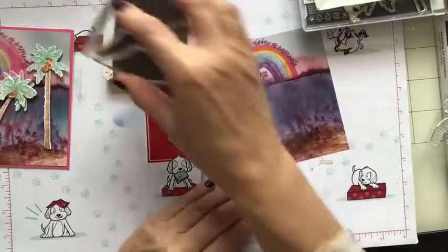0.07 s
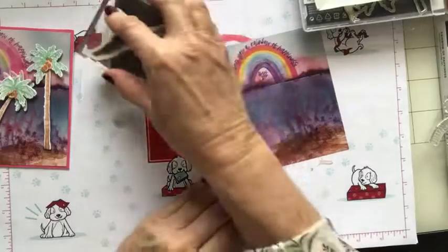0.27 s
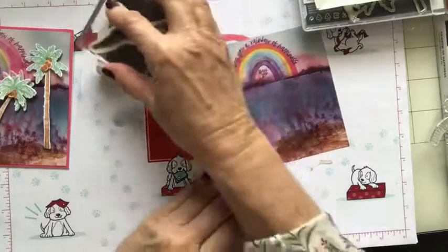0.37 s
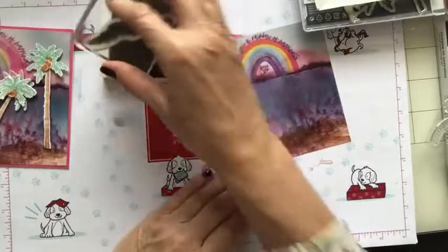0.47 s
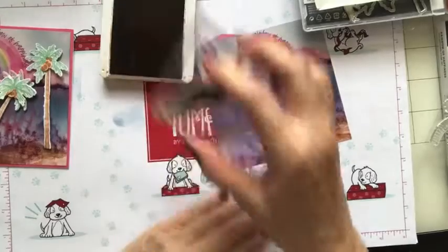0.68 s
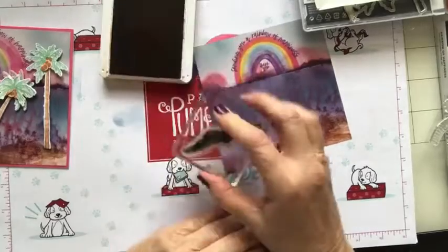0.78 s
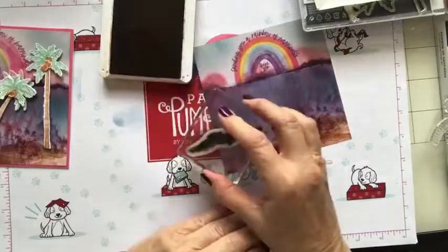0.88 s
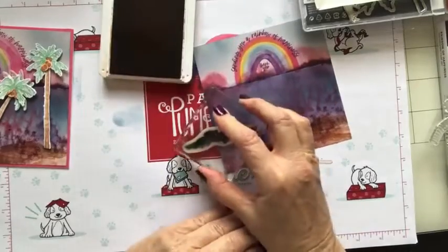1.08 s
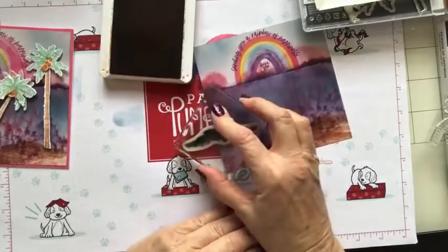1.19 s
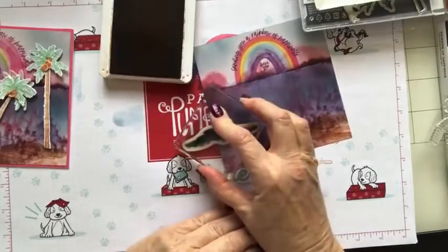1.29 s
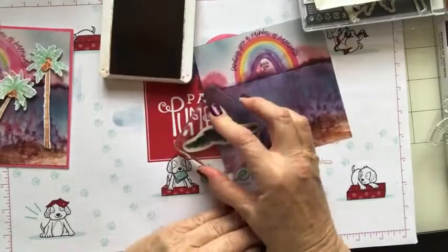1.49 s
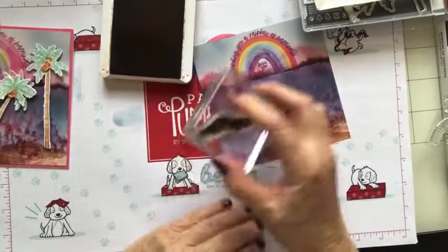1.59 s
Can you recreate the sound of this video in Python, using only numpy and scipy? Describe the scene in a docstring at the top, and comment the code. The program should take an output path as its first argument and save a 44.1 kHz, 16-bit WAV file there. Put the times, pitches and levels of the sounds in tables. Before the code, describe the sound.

Stamp block clacking on a plastic ink pad case atop a wooden desk. Soft hand rustle and a barely audible thin squeak open it; a duller, rattly clack comes at 0.22 s, then sharper, louder ones at 0.37 and 0.49 s, with short room reflections. Rustling fades from 0.6 to 1 s, a faint touch at 1.13, then paper swishes and a light tick at 1.56 over faint room hush.

```python
"""Throughout, a small furnished room hums faintly with filtered noise; at the start a hand rustles, with a thin squeak.
Then an acrylic stamp block is tapped three times on an ink pad in its plastic case, which clacks on a wooden desk:
short rough bursts ring the modes (natural tones) of case and desk, and the room answers with fading noise.
The hand rustles again; the block is set on paper, pressed, and ticks as it shifts, amid swishes of paper noise."""
import sys
import numpy as np
from scipy import signal
from scipy.io import wavfile
from scipy.ndimage import uniform_filter1d

SR = 44100
rng = np.random.default_rng(int(sys.argv[2]) if len(sys.argv) > 2 else 0)


def to_wav(sig):
    """Store sig (one row per channel, or 1-D mono) as 16-bit WAV at the path in sys.argv[1].

    Samples outside -1..1 are clipped; the rate is SR.
    """
    pcm = np.clip(np.atleast_2d(sig), -1, 1) * 32767
    pcm = np.round(pcm).astype(np.int16)
    wavfile.write(sys.argv[1], SR, pcm.T)  # frames by channels


N = 72765   # length of the scene in samples


def amp(db):
    """Turn decibels into a plain factor."""
    return 10 ** (np.asarray(db) / 20)


def rms_one(x):
    """Scale a sound to an rms (average strength) of 1."""
    return x / np.sqrt(np.mean(x ** 2) + 1e-20)


def at_hz(points, hz):
    """Read a curve at a frequency, along a logarithmic frequency axis."""
    curve_hz, values = np.transpose(points)
    return np.interp(np.log(hz), np.log(curve_hz), values)


def drift(rate_hz):
    """Smoothed random wander of rms 1; a higher rate wanders faster."""
    r = np.exp(-2 * np.pi * rate_hz / SR)
    wander = signal.lfilter([1], [1, -2 * r, r * r], rng.standard_normal(N + SR))
    return rms_one(wander[SR:])   # skip the filter's start


def bands(size):
    """Half-octave bands of noise, each with its centre frequency."""
    edges_hz = 25 * 2 ** np.arange(0, 9.7, .5)
    white = rng.standard_normal((2, size + SR // 2))
    for k, (low, high) in enumerate(zip(edges_hz, edges_hz[1:])):
        sos = signal.butter(2, [low, high], "band", fs=SR, output="sos")
        # neighbouring bands take turns between two noises
        yield np.sqrt(low * high), signal.sosfilt(sos, white[k % 2])[SR // 2:]


def coloured(spectrum, patchy_db, rate_hz):
    """Noise of a given spectrum whose bands flicker, partly together and partly alone; rms 1."""
    together = drift(rate_hz)
    total = 0
    for hz, band in bands(N):
        flicker_db = patchy_db * (.6 * together + drift(rate_hz))
        total = total + band * amp(at_hz(spectrum, hz) + flicker_db)
    return rms_one(total)


def room_tone():
    """Steady hush of softly flickering noise, with a low lumpy rumble that swells and fades."""
    # colour of the hush: (frequency [Hz], relative level per Hz [dB])
    hush_colour = [(15, -60), (25, -34.5), (64, 1.5), (190, -6.5), (317, -8.5), (384, -8), (714, -12.5),
                   (962, -14.5), (1040, -22), (3920, -23.5), (16000, -35.5)]
    # colour of the rumble: (frequency [Hz], relative level per Hz [dB])
    rumble_colour = [(30, -36), (55, -12.5), (75, 4.5), (100, 0.75), (190, -9), (300, -27.5), (600, -61)]
    # loudness of the rumble: (time [s], level [dB])
    rumble_level = [(0, -88.5), (0.201, -86), (0.598, -68), (0.848, -68), (1.101, -71.5), (1.2, -89),
                    (1.65, -71.5)]
    rumble_db = np.interp(np.arange(N) / SR, *np.transpose(rumble_level))
    hush = amp(-67) * coloured(hush_colour, patchy_db=2.5, rate_hz=4.1)
    return hush + amp(rumble_db) * coloured(rumble_colour, patchy_db=2.0, rate_hz=12)


def rustle():
    """Soft grainy rubbing of hand and sleeve: flickering noise that swells and fades."""
    # loudness of each stretch of rubbing: (time [s], level [dB])
    stretches = [
        [(0, -64.5), (.04, -61.5), (.11, -62.5), (.16, -72), (.21, -81)],
        [(.52, -99), (.64, -65.5), (.75, -67), (.9, -74), (1.05, -85.5), (1.2, -86), (1.33, -71.5),
         (1.46, -87.5)],
    ]
    # colour of the rubbing: (frequency [Hz], relative level per Hz [dB])
    rubbing_colour = [(350, -40.5), (600, 0.5), (944, -5.5), (1310, 1), (1850, -5.5), (2760, -2),
                      (2950, -8.5), (4780, -4), (11500, -24.5), (14700, -24), (16000, -12)]
    t = np.arange(N) / SR
    level = 0
    for rows in stretches:
        level = level + amp(np.interp(t, *np.transpose(rows), left=-200, right=-200))
    return level * coloured([(250, -9.5)] + rubbing_colour, patchy_db=1.5, rate_hz=50)


def squeak():
    """A thin high tone whose pitch and loudness tremble at random."""
    # path of the squeak: (time [s], frequency [Hz], level [dB])
    path = [(0.03, 14700, -131), (0.038, 14300, -92), (0.095, 14200, -85), (0.112, 13600, -75),
            (0.13, 15000, -99)]
    s, hz, db = np.transpose(path)
    t = np.arange(N) / SR
    pitch_hz = np.interp(t, s, hz) + 150 * drift(300)
    tone = np.sin(2 * np.pi * np.cumsum(pitch_hz) / SR)
    level = uniform_filter1d(np.interp(t, s, amp(db), left=0, right=0), size=400)   # soften the corners
    return tone * level * amp(0.5 + 4.1 * drift(65))


def strike(s, db, centre_hz, modes, burst_s, crack_db):
    """A short rough contact, coloured by how hard it is, rings every mode; rows: near sound, sound sent to the room."""
    t = np.arange(SR // 2) / SR
    start = t == 0
    burst = np.exp(-t / burst_s) * (rng.standard_normal(len(t)) * .16 + start * 2)
    contact = np.array([burst, start])
    # keep 0.72 octave on each side of the contact's colour, and dull it above 9 kHz
    edges_hz = np.clip(centre_hz * 2. ** (np.array([-1, 1]) * 0.72), 20, 19000)
    contact = signal.sosfilt(signal.butter(2, edges_hz, "band", fs=SR, output="sos"), contact + 1e-18)
    contact = signal.lfilter(*signal.butter(1, 9000, fs=SR), contact)
    energy = np.sum(contact ** 2, axis=1, keepdims=True)
    burst, click = contact / np.sqrt(energy * 5000 / centre_hz)

    rung = 0
    level_luck = rng.standard_normal(len(modes))   # every strike rings the modes a little differently
    for k, ((hz, level_db, t60), luck) in enumerate(zip(modes, level_luck)):
        r = amp(-60 / (t60 * SR))   # loss per sample: 60 dB over t60
        w = 2 * np.pi * hz / SR
        gain = amp(level_db + 2 * luck) * np.sin(w) * (-1) ** k   # signs alternate
        rung = rung + signal.lfilter([0, gain], [1, -2 * r * np.cos(w), r * r], burst)

    near = rung + amp(crack_db) * burst
    # summed over all directions a contact is mostly a plain click, with a little of its ring
    sent = amp(-15) * rung + amp(15.5) * click
    out, i = np.zeros((2, N + SR)), int(s * SR)
    out[:, i:i + len(t)] = amp(db) * np.array([near, sent])
    return out[:, :N]


def taps():
    """The block clacks on the pad's case: rough bursts ring the plastic."""
    # contacts of block and case: (time [s], level [dB], colour centre [Hz])
    contacts = [(.2210, -34, 2200), (0.2217, -44.5, 4500), (0.2216, -34.5, 2900), (0.226, -31, 556.3),
                (0.2279, -32, 4600), (0.2286, -50.5, 11000), (0.2310, -33, 1700), (0.232, -39, 4200),
                (0.235, -33, 620), (0.2357, -37.5, 4500), (0.239, -35, 2200), (0.245, -38, 600),
                (0.336, -55, 2618), (0.3639, -30, 1400), (0.3670, -25, 750), (0.3731, -15, 5500),
                (0.3732, -30, 10000), (.3740, -22.5, 1807), (0.3768, -18.5, 1000), (0.3799, -23, 1500),
                (0.3830, -30, 450), (0.4894, -29, 1180), (0.4907, -17, 4500), (0.4908, -30.5, 10000),
                (0.4916, -22, 1400), (0.492, -22.5, 800), (0.495, -30, 3200), (.4965, -31.5, 1500),
                (0.5015, -30.5, 480)]
    # modes of the case: (frequency [Hz], level [dB], time to fall 60 dB [s])
    case_modes = [(373, -2.5, 0.045), (620, -4.5, 0.052), (777, -6.5, 0.064), (853, 1.5, 0.014),
                  (1079, 1.5, 0.0062), (1400, -2, 0.008), (1630, -2, 0.018), (1820, -4.5, 0.02),
                  (2336, -3.5, 0.01), (2576, -9.5, 0.018), (3152, -5.5, 0.018), (3520, -11.5, 0.011),
                  (4070, -8.5, 0.016), (4450, -6, 0.017), (5070, -11, 0.03), (5500, -10, 0.01),
                  (5850, -7, 0.01), (7310, -1.5, 0.005)]
    return sum(strike(s, db, hz, case_modes, burst_s=0.0029, crack_db=11) for s, db, hz in contacts)


def thumps():
    """The desk top answers slow pushes with its low modes."""
    # pushes into the desk: (time [s], level [dB], colour centre [Hz])
    pushes = [(0.226, -34, 230), (.236, -30.5, 115), (.262, -36, 251), (.376, -34.5, 240),
              (0.493, -43.5, 303), (0.604, -51.5, 189.6), (1.130, -56, 200), (1.134, -64.5, 600),
              (1.516, -62, 600), (1.56, -71, 394)]
    # modes of the desk top: (frequency [Hz], level [dB], time to fall 60 dB [s])
    desk_modes = [(75, -6, 0.19), (120.2, -7.5, 0.19), (174.5, -6, 0.11), (246.3, -3, 0.091),
                  (634, -6.5, 0.3)]
    return sum(strike(s, db, hz, desk_modes, burst_s=0.0041, crack_db=11.5) for s, db, hz in pushes)


def room(x):
    """Dense reflections: each sound is smeared by noise that dies away band by band."""
    # how long the room rings: (frequency [Hz], time to fall 60 dB [s])
    ring_time = [(100, 0.7), (300, 0.42), (600, 0.33), (1840, .35), (4850, 0.34), (12800, 0.18)]
    # colour of the reflections: (frequency [Hz], relative level [dB])
    reflection_colour = [(100, 2), (300, 7), (550, 7.5), (1000, 2.5), (1800, 4.5), (2500, 0), (5000, -0.8),
                         (8000, -3), (11000, -13), (15000, -4)]
    t = np.arange(SR) / SR
    tail = 0
    for hz, band in bands(SR):
        tail = tail + band * amp(at_hz(reflection_colour, hz) - 60 * t / at_hz(ring_time, hz))
    tail = tail * (1 - np.exp(-t / 0.0016))   # the reflections build up within a few ms
    tail = tail / np.sqrt(np.sum(tail ** 2))
    return amp(-4.5) * signal.fftconvolve(x, tail)[:N]


def brushing():
    """Short bright swishes of paper: noise that swells and fades like half a sine wave."""
    # swishes around the ticks: (start [s], length [s], peak level [dB])
    swishes = [(1.111, 0.030, -69), (1.513, 0.017, -62), (1.523, 0.074, -66), (1.532, 0.013, -60),
               (1.548, 0.012, -63)]
    # colour of the swishes: (frequency [Hz], relative level per Hz [dB])
    paper_colour = [(880, -65), (1500, -25.5), (1620, -2), (2040, 7), (3000, 14.5), (13800, -2.5),
                    (16000, -33)]
    t = np.arange(N) / SR
    shape = 0
    for start, length, db in swishes:
        shape = shape + amp(db) * np.sin(np.pi * np.clip((t - start) / length, 0, 1))
    return shape * coloured([(500, -30)] + paper_colour, patchy_db=2.5, rate_hz=150)


def ticks():
    """The block ticks against paper and desk: very short bursts ring the acrylic."""
    # contacts of block and paper: (time [s], level [dB], colour centre [Hz])
    touches = [(1.130, -62, 3000), (1.135, -70, 4000), (1.186, -70, 1200), (1.4855, -70, 1500),
               (1.5410, -67, 3000), (1.5555, -66, 3800), (1.5583, -41, 3600), (1.5598, -38.5, 3600),
               (1.5599, -51, 12000), (1.5625, -45, 650), (1.5715, -57, 3300), (1.578, -54, 650)]
    # modes of the block: (frequency [Hz], level [dB], time to fall 60 dB [s])
    block_modes = [(600, -4.5, 0.026), (960, -4.5, 0.024), (1965, 5.5, 0.0071), (2560, 2, 0.0069),
                   (3340, 5.5, 0.0052), (3980, 0.5, 0.006), (5020, 1.5, 0.0068), (5610, -2, 0.0083),
                   (13980, 5, 0.0026)]
    return sum(strike(s, db, hz, block_modes, burst_s=0.0013, crack_db=16.0) for s, db, hz in touches)


def scene():
    """Hits and paper swishes with their room, over rustle, squeak and room tone."""
    near, sent = taps() + thumps() + ticks() + brushing()   # the swishes go equally into both rows
    background = room_tone() + rustle() + squeak()
    return (near + room(sent) + background)[None]


def record(dry):
    """The microphone drops the deep bass below 55 Hz; the top is cut steeply, 60 dB down from 16.4 kHz."""
    dry = signal.sosfilt(signal.butter(2, 55, "high", fs=SR, output="sos"), dry)
    return signal.sosfilt(signal.cheby2(16, 60, 16400, fs=SR, output="sos"), dry)


dry = scene()
out = record(dry)
to_wav(out)
```